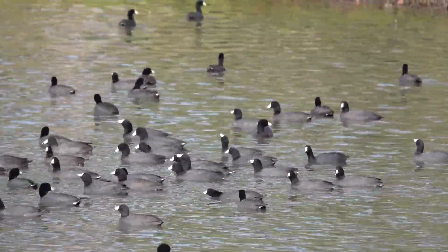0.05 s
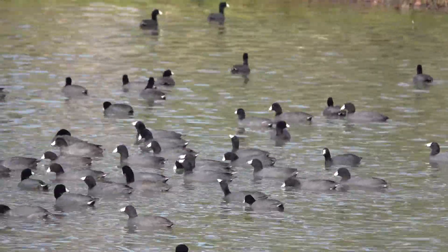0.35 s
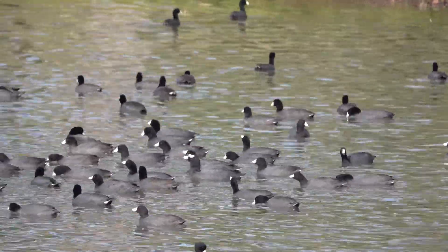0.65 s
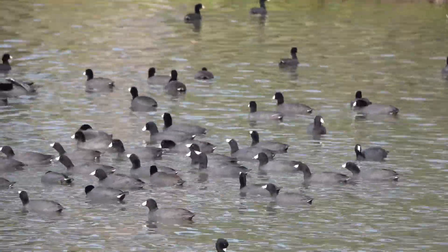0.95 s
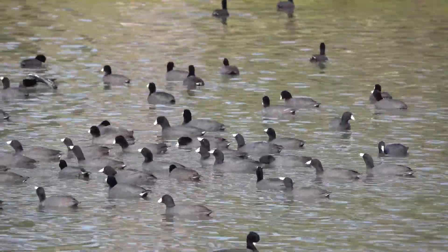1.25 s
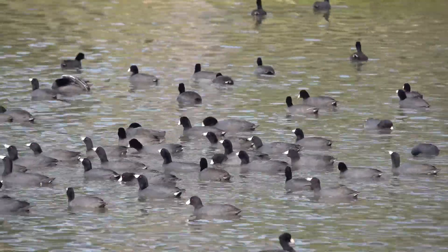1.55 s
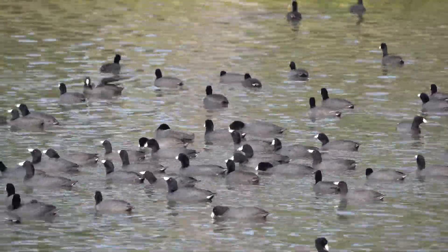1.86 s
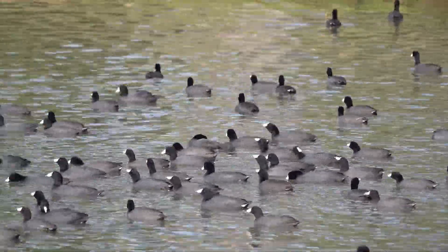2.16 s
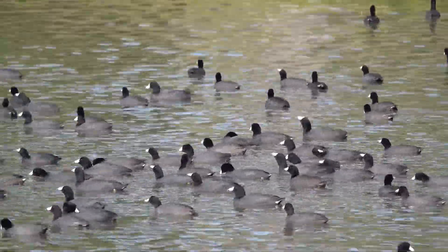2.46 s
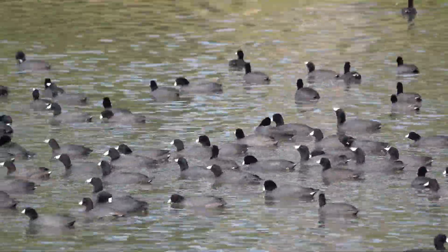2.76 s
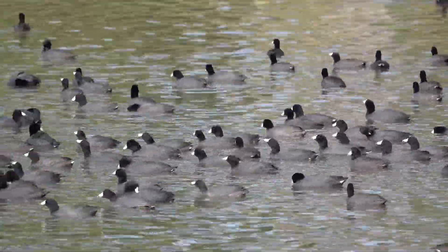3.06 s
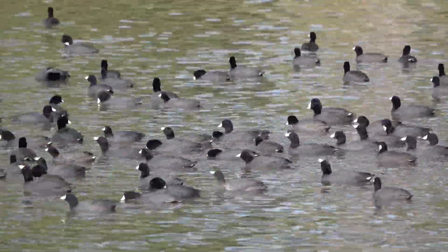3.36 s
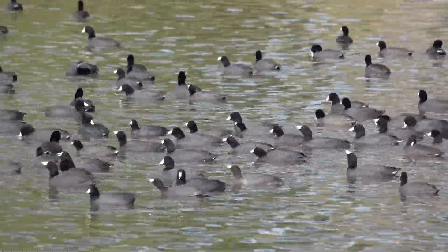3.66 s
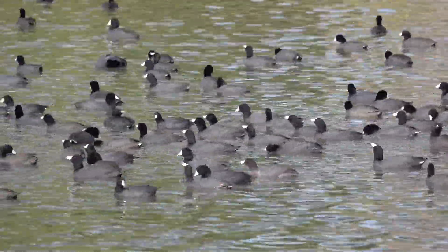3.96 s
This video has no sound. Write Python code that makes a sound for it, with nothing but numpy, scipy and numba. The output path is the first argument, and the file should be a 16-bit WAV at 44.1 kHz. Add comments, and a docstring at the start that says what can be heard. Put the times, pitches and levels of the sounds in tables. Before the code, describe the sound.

Gusty wind rumbles on the microphone, with faint distant traffic and one brief bird chirp.

```python
"""Wind on a pondside microphone.

Gusts buffet a camera's microphone ports, over far traffic and the hiss and whir of the camera's motor.
A far engine whines briefly. A small bird peeps faintly; later one chirps close by on the left.
Gain control ducks the whole mix under the strongest gusts."""
import sys
import numpy as np
from scipy import signal
from scipy.fft import rfft, irfft
from scipy.io import wavfile
from numba import njit

SR = 44100
rng = np.random.default_rng(int(sys.argv[2]) if len(sys.argv) > 2 else 0)


def dump(signal):
    """Clip the signal to [-1, 1] and save it as 16-bit WAV at the path in sys.argv[1]."""
    limited = np.clip(np.atleast_2d(signal).T, -1, 1)
    pcm = np.round(limited * 32767).astype(np.int16)
    wavfile.write(sys.argv[1], SR, pcm)


N = 176400

# Gust strength: time_s, rumble_gain_db, rush_gain_db
GUSTS = [(0.0, -2.5, 2.5), (0.14, -6.5, -9), (0.24, -1, 1.5), (0.34, 3.0, 1.5), (0.42, 1, -2.5),
         (0.54, -1.0, -5.5), (0.74, -9.5, -14.5), (0.86, -1.5, -3), (0.96, -6.5, -11.5), (1.03, 0.5, -3.5),
         (1.09, -6, -1), (1.19, 2, 5.5), (1.38, 2.5, 9), (1.48, 4.5, 5), (1.61, 0, -4.5), (1.69, 1, 1.5),
         (1.77, -1.5, -3.5), (1.94, 0.5, 1.5), (2.07, -2.5, -2.5), (2.16, 2, -3.5), (2.25, -4.5, -4.0),
         (2.38, -0.5, -4.5), (2.51, -4, -11.5), (2.61, 1, 1.5), (2.69, -5.5, -2.5), (2.801, -1, -6.5),
         (2.89, -2, 6.5), (3.07, 0.5, -0.5), (3.27, 1.5, 4.5), (3.39, 1.0, -4), (3.46, 1.5, 7.5),
         (3.55, 1, 6.5), (3.63, 5, 13), (3.72, 3, 14.5), (3.83, 8.0, 17), (3.91, -0.5, 11.5),
         (4.0, 7, 16.5)]
# Wind spectrum: freq_hz, density_db
WIND_SPECTRUM = [(8, -74), (20, -62), (30, -66), (46, -47), (70, -37.5), (100, -37.5), (165, -38),
                 (260, -43), (390, -50), (520, -57.5), (750, -70), (1100, -84.5), (2000, -107.5),
                 (3500, -110)]
# Wind likeness between the ports: freq_hz, correlation
WIND_CORRELATION = [(30, 1), (80, 0.92), (160, 0.54), (300, 0.071), (550, -0.15), (1000, 0.031)]
# Single eddies: centre_s, gain_db, left_minus_right_db, peak_hz
EDDIES = [(0.278, -4.5, 0, 170), (1.217, -4, -2, 200), (1.255, -5, 3, 220), (1.546, -16, -4, 380),
          (3.272, -7, 3, 220), (3.614, -2, 5, 160), (3.621, -13, 1, 520), (3.740, -4, 1, 220),
          (3.985, -6, -5, 340)]
# Near bird: time_s, pitch_hz, level_db
NEAR_CHIRP = [(3.641, 4800, -52), (3.647, 5100, -36), (3.657, 5370, -27.5), (3.663, 5250, -21.5),
              (3.671, 4860, -27), (3.681, 4340, -32.5), (3.685, 3950, -36), (3.695, 3550, -37),
              (3.703, 3400, -49)]
# Far bird: time_s, pitch_hz, level_db
FAR_PEEP = [(1.19, 2430, -61), (1.23, 2410, -54), (1.265, 2450, -54.5), (1.3, 2430, -67)]
# Bird reflections off water and bank: delay_s, gain_db
BIRD_REFLECTIONS = [(.012, -9), (.029, -18)]
# Far engine: time_s, fundamental_hz, level_db
ENGINE_TRACK = [(2.26, 238.4, -56), (2.32, 245, -42.5), (2.55, 248.1, -39), (2.75, 251, -45),
                (2.95, 249, -76)]
# Engine harmonics: order, gain_db
ENGINE_HARMONICS = [(2, 2.5), (3, -1.5), (4, -16), (5, -18)]
# Far roads: freq_hz, density_db
TRAFFIC_SPECTRUM = [(60, -47), (300, -73), (500, -72.5), (750, -71), (1000, -72), (1200, -77.5),
                    (1600, -80), (2000, -84), (2500, -94), (4000, -97.5), (8000, -106)]
# Camera hiss: freq_hz, density_db
HISS_SPECTRUM = [(3000, -104), (5000, -100.5), (7400, -91), (8000, -88.5), (9300, -98), (10000, -81),
                 (10800, -84.5), (11500, -81.5), (12500, -84), (13200, -86), (13800, -91), (15500, -99)]
# Casing resonances: centre_hz, width_hz, left_density_db, right_density_db
CASING_MODES = [(1422, 16.5, -67, -81), (1460, 17, -71.5, -83), (1604, 43, -76, -96),
                (1713, 22.3, -68.5, -79), (1912, 46, -76.5, -102), (2514, 15, -78, -77),
                (2790, 370, -82, -129), (3200, 1150, -87.5, -99), (4620, 165, -78.5, -82.5),
                (4897, 190, -75.5, -85.5), (5420, 150, -82.5, -96), (5850, 440, -83.5, -94),
                (6400, 400, -81, -100), (6980, 160, -80.5, -86), (8860, 800, -88, -102)]
# Lead of the camera's sound at the left port: freq_hz, phase_rad
LEFT_LEAD = [(1400, .3), (1720, .7), (2240, .2), (2930, 3), (4300, 2.7), (4700, 4.5), (6800, 4.11),
             (8350, 5), (9900, 5.46), (12000, 5.93), (13600, 6.28), (15200, 7.4)]


def wind(crossover_hz=270, shared_flutter_db=1.25, own_flutter_db=.9):
    """Turbulence in octave bands: low ones follow the rumble, high ones the rush; all flutter."""
    f, out = freqs_hz(), 0
    time_s, rumble_db, rush_db = np.array(GUSTS).T
    rumble_db, rush_db = np.interp(times_s(), time_s, rumble_db), np.interp(times_s(), time_s, rush_db)
    spectrum, correlation = undb(at_hz(WIND_SPECTRUM, f)), at_hz(WIND_CORRELATION, f)
    shared_db = shared_flutter_db * wander(70)
    for centre_hz in 25 * 2 ** np.arange(8):
        band = np.cos(np.pi / 2 * np.clip(np.log2(f / centre_hz), -1, 1))
        rush_share = 1 / (1 + (crossover_hz / centre_hz) ** 4)
        gust_db = rumble_db + (rush_db - rumble_db) * rush_share
        flutter_db = (0.5 + rush_share) * shared_db + own_flutter_db * wander(45)
        out = out + undb(gust_db + flutter_db) * stereo_noise(band * spectrum, correlation)
    return out


def eddy_slaps():
    """Each eddy is one quick pull and push of pressure at the ports."""
    out = 0
    for centre_s, gain_db, pan_db, peak_hz in EDDIES:
        u = 2 * np.pi * peak_hz * (times_s() - centre_s)
        pulse = u / (1 + u ** 2) ** 2
        out = out + pulse * undb([[gain_db + pan_db / 2], [gain_db - pan_db / 2]])
    return out


def birds(rough_db=2, octave_db=-13, right_db=-31):
    """Rough whistles on the left, gaining an octave when loudest, reflected by water and bank."""
    t, song = times_s(), 0
    roughness = undb(rough_db * wander(290))
    for phase, amp in (glide(NEAR_CHIRP), glide(FAR_PEEP)):
        octave = undb(octave_db) * amp / amp.max() * np.sin(2 * phase)
        song = song + roughness * amp * (np.sin(phase) + octave)
    reflected = sum(undb(db) * np.interp(t - delay_s, t, song) for delay_s, db in BIRD_REFLECTIONS)
    return (song + reflected) * undb([[0], [right_db]]) + bank_echo(song)


def bank_echo(song, delay_s=.005, t60_s=0.2, left_db=-6.5, right_db=-15.5):
    """The bank scatters the song into a short diffuse tail."""
    t = times_s()
    tail = rng.standard_normal((2, N)) * undb(-60 * t / t60_s) * (t > delay_s)
    tail /= np.sqrt(np.sum(tail ** 2, axis=1, keepdims=True))
    return signal.fftconvolve(song[None], tail, axes=1)[:, :N] * undb([[left_db], [right_db]])


def far_engine(waver_db=1.2, waver_rad=1.1):
    """Engine harmonics waver in level and phase, partly alike at the two ports."""
    phase, amp = glide(ENGINE_TRACK)
    left, other = (sum(undb(db + waver_db * wander(14)) * np.sin(order * phase + waver_rad * wander(23))
                       for order, db in ENGINE_HARMONICS) for _ in range(2))
    return amp * np.array([left, (left + other) / 2])


def far_traffic():
    """Far roads merge into a steady wash."""
    return stereo_noise(undb(at_hz(TRAFFIC_SPECTRUM, freqs_hz())), correlation=0.67)


def camera_motor(hiss_flutter_db=0.77, whir_flutter_db=1.2):
    """A small motor hisses at both ports and rings the casing, mostly at the left."""
    f, comb = freqs_hz(), motor_comb()
    hiss = stereo_noise(comb * undb(at_hz(HISS_SPECTRUM, f)), correlation=.96)
    hiss *= undb(hiss_flutter_db * wander(26))
    casing_power = sum(undb([[left_db], [right_db]]) ** 2 * resonance(f - centre_hz, 0.77 * width_hz)
                       for centre_hz, width_hz, left_db, right_db in CASING_MODES)
    whir = stereo_noise(comb * np.sqrt(casing_power), correlation=.88)
    whir *= undb(whir_flutter_db * wander(21))
    left, right = hiss + whir
    lag = np.exp(-1j * at_hz(LEFT_LEAD, f))
    return np.array([left, irfft(rfft(right) * lag, N)])


def motor_comb(turn_hz=116.22, line_db=5.5, scatter_db=1, half_width_hz=6.7):
    """The motor repeats each turn, so its noise bunches at multiples of the turn rate."""
    f = freqs_hz()
    order = np.round(f / turn_hz).astype(int)
    line_gain = undb(line_db + scatter_db * rng.standard_normal(order.max() + 1))
    power = 1 + line_gain[order] ** 2 * resonance(f - order * turn_hz, half_width_hz)
    return np.sqrt(power / power.mean())


def agc_gain(dry, threshold_db=-20.5, ratio=3.37, attack_s=0.014, release_s=0.91, low_cut_hz=263):
    """Soft-knee gain control, deaf to the deepest rumble."""
    sensed = signal.sosfilt(signal.butter(2, low_cut_hz, "high", fs=SR, output="sos"), dry)
    start = float(undb(-16.5))  # still held from an earlier gust
    envelope = follow(np.abs(sensed).mean(axis=0), start, attack_s, release_s)
    return (1 + (envelope / undb(threshold_db)) ** 4) ** (-(1 - 1 / ratio) / 4)


@njit
def follow(x, level, attack_s, release_s):
    """One-pole attack/release envelope."""
    out = np.empty(len(x))
    for i in range(len(x)):
        level += (x[i] - level) / (SR * (attack_s if x[i] > level else release_s))
        out[i] = level
    return out


def undb(db):
    return 10 ** (np.asarray(db) / 20)


def times_s():
    return np.arange(N) / SR


def freqs_hz():
    return np.maximum(np.arange(N // 2 + 1) * SR / N, 1)


def at_hz(table, hz):
    """Interpolates (freq_hz, value) rows on a log-frequency axis."""
    freq_hz, value = np.array(table).T
    return np.interp(np.log(hz), np.log(freq_hz), value)


def resonance(offset_hz, half_width_hz):
    """Power peak, 6 dB down at the half width."""
    return 1 / (1 + (offset_hz / half_width_hz) ** 2) ** 2


def noise(density):
    """Noise of the given amplitude per root Hz."""
    return irfft(rfft(rng.standard_normal(N)) * density, N) * np.sqrt(SR / 2)


def stereo_noise(density, correlation):
    """Partly correlated left and right noise."""
    c = np.clip(correlation, -.99, .99)
    mid, side = noise(density * np.sqrt((1 + c) / 2)), noise(density * np.sqrt((1 - c) / 2))
    return mid + np.array([[1], [-1]]) * side


def wander(rate_hz):
    """Smooth random signal of unit deviation."""
    x = noise(np.exp(-(freqs_hz() / rate_hz) ** 2))
    return x / x.std()


def glide(table):
    """Phase and amplitude of a tone along (time_s, pitch_hz, level_db) rows."""
    time_s, pitch_hz, level_db = np.array(table).T
    t = times_s()
    phase = 2 * np.pi * np.cumsum(np.interp(t, time_s, pitch_hz)) / SR
    return phase, undb(np.interp(t, time_s, level_db)) * (t > time_s[0]) * (t < time_s[-1])


def scene():
    return wind() + eddy_slaps() + far_traffic() + far_engine() + camera_motor() + birds()


def record(dry, makeup_db=0.57, top_hz=15500):
    """Gain control, eased ends, steep low-pass."""
    ducked = dry * agc_gain(dry) * undb(makeup_db)
    low_pass = signal.ellip(10, .2, 80, top_hz, fs=SR, output="sos")
    return signal.sosfilt(low_pass, ducked * signal.windows.tukey(N, .002))


dry = scene()
out = record(dry)
dump(out)
```